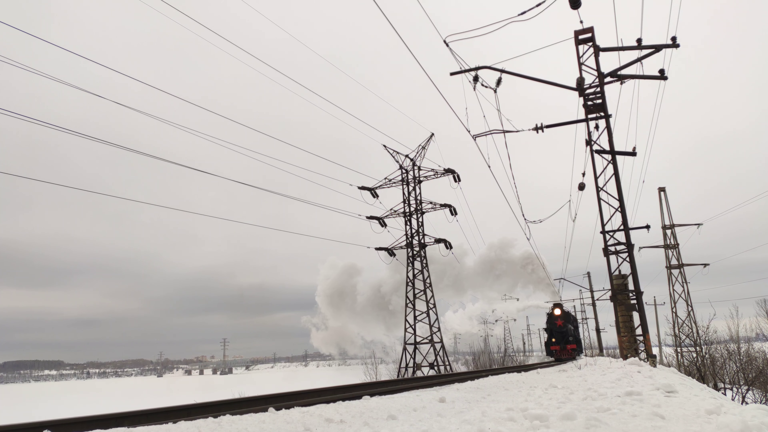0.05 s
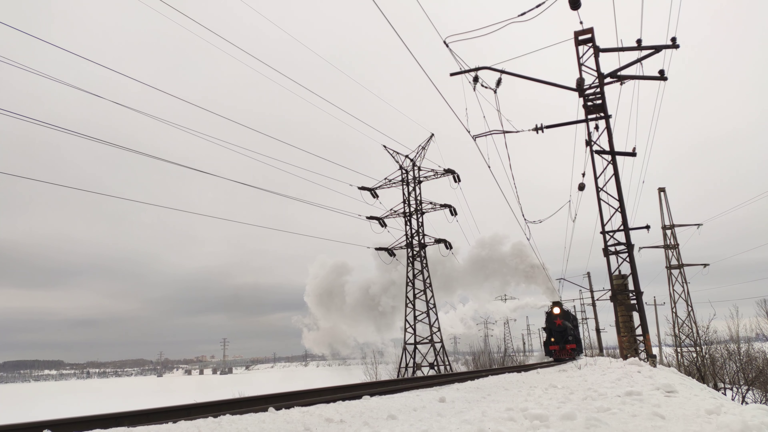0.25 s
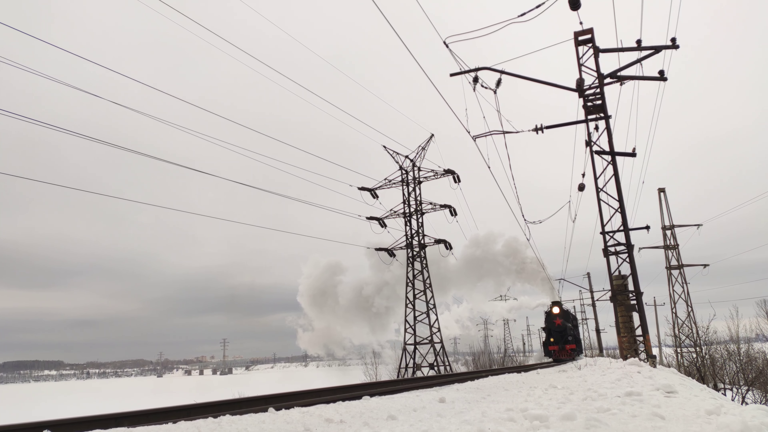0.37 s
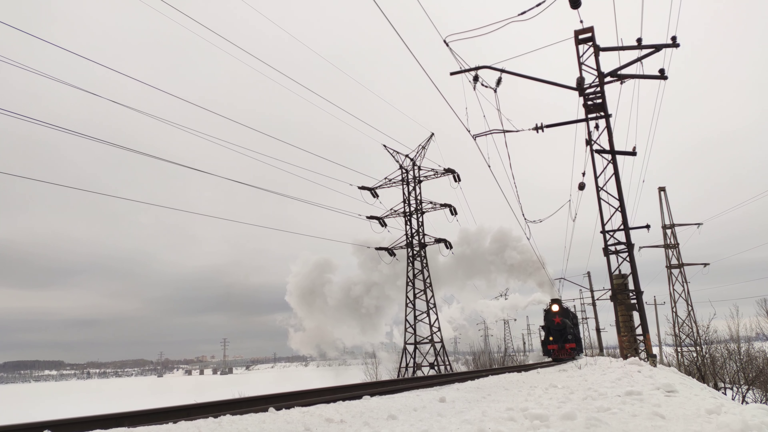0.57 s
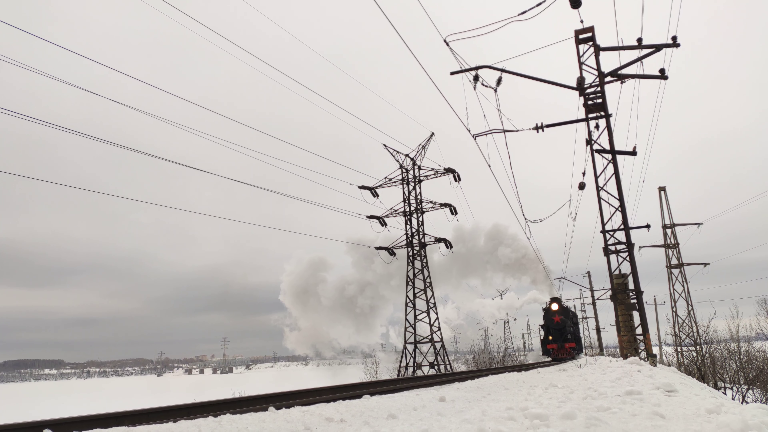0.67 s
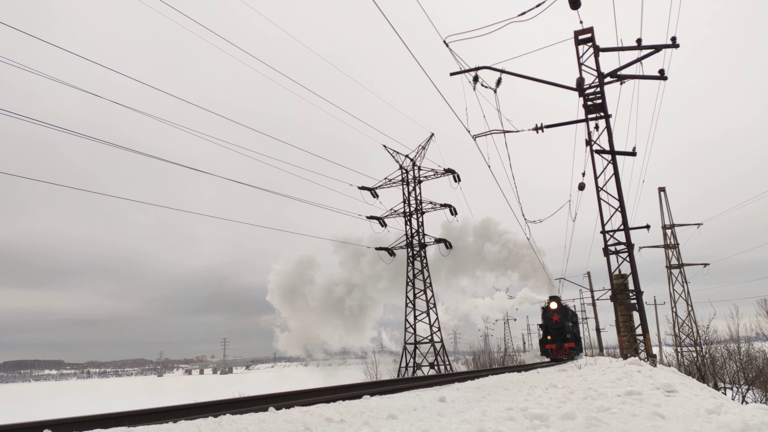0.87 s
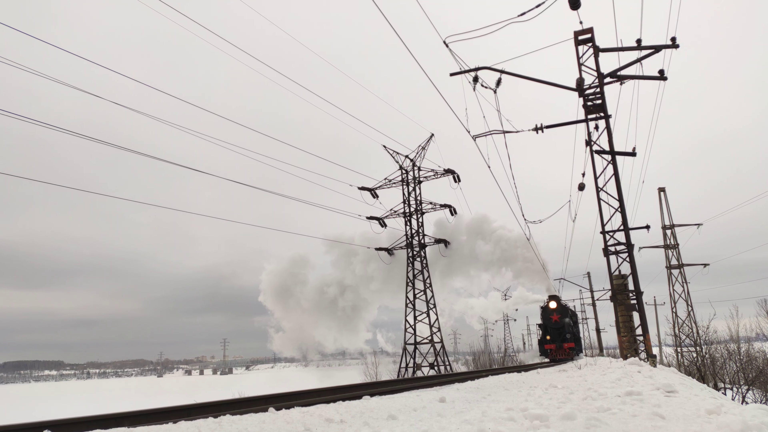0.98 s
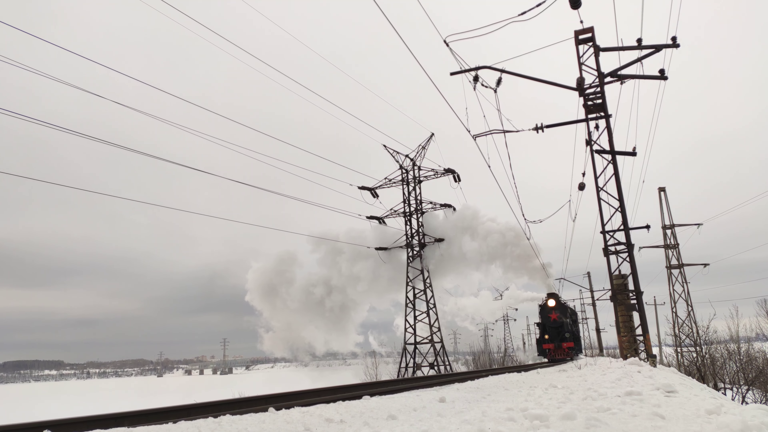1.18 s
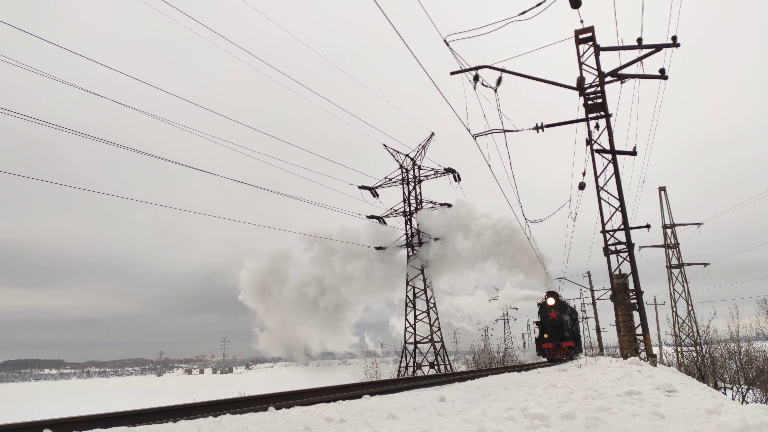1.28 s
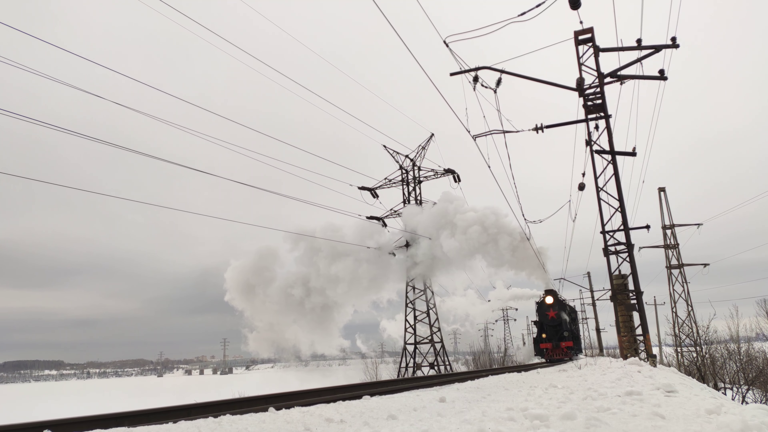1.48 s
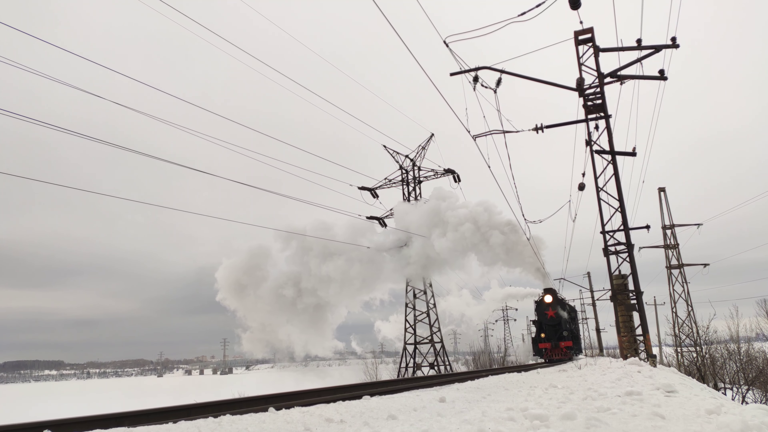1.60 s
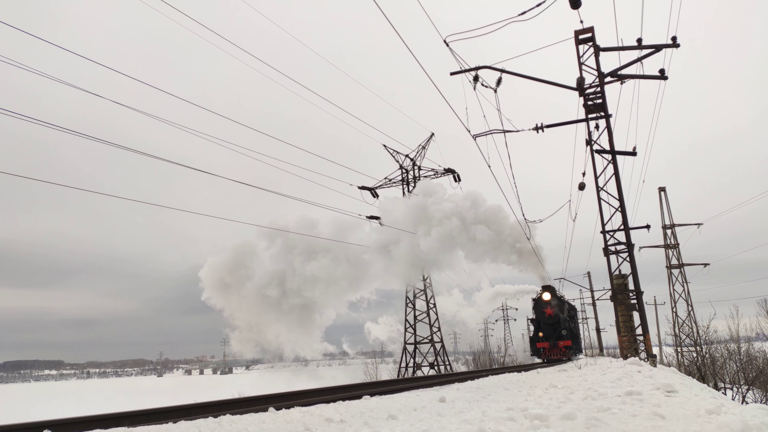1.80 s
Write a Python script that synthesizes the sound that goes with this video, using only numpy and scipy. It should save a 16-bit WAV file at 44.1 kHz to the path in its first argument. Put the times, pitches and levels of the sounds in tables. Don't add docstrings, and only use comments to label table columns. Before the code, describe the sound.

A steam locomotive whistle sounds one reedy mid-pitched blast over hissing steam, low wheel rumble and wind knocks on the microphone; it sags off, then a dull chuff, brief squeak and soft puff follow, echoes fading.

```python
import sys
import numpy as np
from scipy import signal
from scipy.fft import rfft, irfft
from scipy.io import wavfile

SR = 44100
rng = np.random.default_rng(int(sys.argv[2]) if len(sys.argv) > 2 else 0)


def magnitude_from_level(level_db):
    exponent = np.asarray(level_db, float) / 20
    return 10 ** exponent


def int16_out(signal):
    q = np.round(np.clip(np.atleast_2d(signal).T, -1, 1) * 32767)
    wavfile.write(sys.argv[1], SR, q.astype(np.int16))


N = 81585

# start_s [s], level_db [dB]
BLOW = [
    (0.196, -67),
    (0.215, -41),
    (.275, -29.5),
    (0.34, -31.5),
    (0.928, -26.5),
    (0.999, -27.5),
    (1.192, -24.5),
    (1.279, -31.5),
    (1.342, -36),
]


def rms_one(x):
    return x / np.sqrt(np.mean(x ** 2) + 1e-20)


def clock():
    return np.arange(N) / SR


def noise(*shape):
    return rng.standard_normal((*shape, N))


def filtered(x, order, hz, kind="low"):
    return signal.sosfilt(signal.butter(order, hz, kind, fs=SR, output="sos"), x)


def drift(rate_hz):
    pole = np.exp(-80 * np.pi * rate_hz / SR)
    raw = rng.standard_normal(N // 40 + 2002)
    slow = signal.lfilter([1], [1, -2 * pole, pole * pole], raw)[2000:]
    return np.interp(np.arange(N) / 40, np.arange(len(slow)), rms_one(slow))


def complex_drift(rate_hz):
    return drift(rate_hz) + 1j * drift(rate_hz)


def banded_noise(spectrum, patchy_db, channels):
    out, together = 0, drift(7.0)
    edges = 22 * 2 ** np.arange(0, 9.6, .5)
    white = noise(2, channels)
    hz, db = np.transpose(spectrum)
    for k, (low, high) in enumerate(zip(edges, edges[1:])):
        band = filtered(white[k % 2], 2, [low, high], "band")
        level_db = np.interp(np.log(low * high) / 2, np.log(hz), db)
        flicker_db = patchy_db * (.5 * together + drift(12))
        out = out + magnitude_from_level(level_db + flicker_db) * band
    return rms_one(out)


def two_ports(x):
    lag_s, dull_db, dull_hz, dull_sharp = 6.6 / 44100, -4.5, 4700, 2.5
    hz = np.fft.rfftfreq(N, 1 / SR)
    shade = magnitude_from_level(dull_db * np.exp(-dull_sharp * np.log(hz / dull_hz + 1e-9) ** 2))
    delay = np.exp(-2j * np.pi * hz * lag_s)
    return np.array([x, irfft(rfft(x) * shade * delay, N)])


def rumble():
    # frequency_hz [Hz], density_db [dB per Hz]
    roll_spectrum = [(25, -3.5), (150, 0), (400, -2), (800, -6), (1500, -6.5), (2500, -6), (6300, -12),
                     (14000, -50.5)]
    level_db, alike = -44, 0.61
    near, left, right = banded_noise(roll_spectrum, patchy_db=3.0, channels=3)
    diffuse = filtered([left, right], 2, 1800)
    return magnitude_from_level(level_db) * (np.sqrt(alike) * two_ports(near) + np.sqrt(1 - alike) * diffuse)


def wind():
    # start_s [s], peak_db [dB], pitch_hz [Hz]
    knock_table = [(0.024, -26.5, 270), (0.095, -32, 209), (0.112, -27, 254), (0.157, -23.5, 186),
                   (0.17, -39, 153), (0.33, -28, 192), (0.341, -29, 142), (0.354, -20.5, 300),
                   (0.376, -24, 224), (0.394, -25, 190), (0.422, -28.5, 169), (0.437, -33.5, 167),
                   (0.453, -29.5, 242), (0.471, -30.5, 171), (0.499, -30.5, 121), (0.535, -25.5, 168),
                   (0.571, -34, 200.6), (0.623, -31.5, 136), (0.699, -33, 129), (0.787, -35.5, 177),
                   (0.805, -32.5, 102), (0.82, -27.5, 197), (0.833, -30, 245), (0.811, -29.5, 61.6),
                   (.866, -36.5, 53), (1.329, -31, 227), (1.352, -31, 222), (1.44, -36.5, 146),
                   (1.511, -35, 280), (1.535, -43, 157.5), (1.078, -35, 162), (1.148, -32, 214),
                   (1.181, -38, 156), (1.768, -35.5, 116), (1.849, -25.5, 219)]
    # start_s [s], level_db [dB]
    breeze = [(0, 9), (.1, 8.5), (.22, 4), (.4, 6), (.7, -5), (.83, 11), (.95, -14.5), (1.1, 2), (1.3, 0),
              (1.65, -9), (1.78, 9.5), (1.85, 3)]
    lump_db, knock_cycles, push, push_s, leak_db = 5, .62, .3, .009, -35
    t = clock()
    lumps = []
    for level_db, top_hz in [(-51.5, 98), (-70.5, 110)]:
        buffet = rms_one(filtered(noise(), 2, [20, top_hz], "band"))
        lumps.append(magnitude_from_level(level_db + lump_db * drift(8)) * buffet)
    knocks = np.zeros(N)
    for start_s, peak_db, hz in knock_table:
        since = t - start_s
        thump = np.exp(-(since * hz / knock_cycles) ** 2) * np.cos(2 * np.pi * hz * since)
        sway = -push * since / push_s * np.exp(-(since / push_s) ** 2)
        knocks += magnitude_from_level(peak_db) * (thump + sway)
    gusts = magnitude_from_level(np.interp(t, *np.transpose(breeze)))
    return np.array(lumps) * gusts + knocks * magnitude_from_level([[0], [leak_db]])


def puff():
    start_s, attack_s, hold_s, release_s, level_db = 1.398, .025, .1, .09, -43
    corners = np.cumsum([start_s, attack_s, hold_s, release_s])
    shape = np.interp(clock(), corners, [0, 1, .75, 0])
    breath = rms_one(filtered(noise(3), 4, [3400, 7900], "band"))
    return magnitude_from_level(level_db + 1.6 * drift(28)) * shape * breath


def steam():
    # start_s [s], level_db [dB]
    flow = [(0, -62), (0.199, -63), (.33, -52.5), (0.489, -43.5), (0.641, -46), (.8, -51), (0.89, -48),
            (1.02, -44.5), (1.201, -49.5), (1.31, -51.5), (1.62, -54.5), (1.75, -56), (1.85, -46.5)]
    # frequency_hz [Hz], density_db [dB per Hz]
    hiss_spectrum = [(1500, -6.5), (3000, -52.5), (4500, 7.5), (6200, -4), (7200, -0.5), (9000, 4.5),
                     (11000, -13.5), (14000, -6)]
    level_db, spread_db = 3.0, -5
    flow_db = np.interp(clock(), *np.transpose(flow))
    jet = magnitude_from_level(flow_db + level_db) * banded_noise(hiss_spectrum, patchy_db=.8, channels=3) + puff()
    spread = filtered(jet[1:], 2, 4500, "high")
    return two_ports(jet[0]) + magnitude_from_level(spread_db) * spread


def chuff():
    start_s, level_db, rise_s, t60_s = 1.325, -41, 0.017, 0.3
    since = np.maximum(clock() - start_s, 0)
    burst = rms_one(filtered(noise(), 1, (200, 2200), "band"))
    return magnitude_from_level(level_db - 60 * since / t60_s) * np.minimum(since / rise_s, 1) * burst


def squeak():
    start_s, level_db, rise_s, t60_s = 1.343, -41, 0.0049, .17
    pitch_hz, sag_hz_per_s, rough = 1160, 260, .9
    since = np.maximum(clock() - start_s, 0)
    turn = 2 * np.pi * (pitch_hz * since - sag_hz_per_s * since ** 2 / 2)
    roughness = 1 + rough * (drift(109) + 1j * drift(110))
    tone = np.imag(np.exp(1j * turn) * roughness)
    return magnitude_from_level(level_db - 60 * since / t60_s) * tone * np.minimum(since / rise_s, 1)


def late(x, delay_s, ratio):
    t, start_s = clock(), BLOW[0][0]
    return np.interp((t - start_s - delay_s) * ratio + start_s, t, x, left=0)


def near_scatter(x):
    level_db, longest_s, drop, cross_db = -24, .13, .04, -12
    sides = np.zeros((2, N))
    for k, (a, b) in enumerate(rng.random((8, 2))):
        gain = magnitude_from_level(level_db + 9.4 * drift(1.71))
        sides[k % 2] += gain * late(x, longest_s * a, 1 - drop * a * b)
    left, right = filtered(sides, 1, 2000, "high")
    return two_ports(left) * magnitude_from_level([[3], [cross_db]]) + two_ports(right) * magnitude_from_level([[cross_db], [3]])


def echoes(x):
    # delay_s [s], level_db [dB], left_right_db [dB]
    clear = [
        (.09, -20, 0.5),
        (.2, -24.5, 3),
        (.47, -35.5, 11),
        (.66, -30, 3.5),
        (1.0, -33.5, 17),
    ]
    ratios = (.997, .998, .997, .996, .95)
    scatter_db, scatter_t60_s, scatter_drop, flicker_db = -24.5, 1.4, 0.052, 2.0
    returns = [(delay_s, db, ratio, pan_db) for (delay_s, db, pan_db), ratio in zip(clear, ratios)]
    for a, b, c in rng.random((24, 3)):
        returns.append((.1 + a, scatter_db - 60 * a / scatter_t60_s, 1 - scatter_drop * b, 12 * c - 6))
    dull = filtered(x, 2, 2440)
    out = np.zeros((2, N))
    for delay_s, db, ratio, pan_db in returns:
        sides_db = pan_db * np.array([[.5], [-.5]])
        out += magnitude_from_level(db + flicker_db * drift(4.2) + sides_db) * late(dull, delay_s, ratio)
    return out + near_scatter(x)


def air_ray(order):
    share = .05 + .1 * (order - 1)
    flutter = .07 * np.sqrt(order - 1) * complex_drift(55)
    return (1 + flutter + share * complex_drift(21)) / np.sqrt(1 + 2 * share ** 2)


def speaking(order):
    t, gain = clock(), 1
    if order > 1:
        onset_s = .2 + 0.0093 * order + 0.054 * (order == 2)
        gain = np.clip((t - onset_s) / 0.035, 0, 1)
    if order == 2:
        gain = gain * np.clip(1 - (t - 1.215) / 0.019, .2, 1)
    if order > 3:
        gain = gain * np.clip(1 - (t - 1.225) / .04, .35, 1)
    if order == 4:
        gain = gain * magnitude_from_level(-1.5 * (t - 1.07))
    return gain


def whistle():
    blow_hz = (730, 768, 802, 821, 823, 814, 812, 777, 752)
    # multiple [1], level_db [dB]
    partials = [(1, 1.5), (2, -17), (3, -9), (4, -11), (5, -10.5), (6, -13.5), (7, -21), (8, -30),
                (9, -56.5)]
    # start_s [s], depth_db [dB], half_width_s [s]
    fades = [(0.438, 4, 0.032), (0.65, 4, 0.049), (0.738, 7.5, 0.026), (0.868, 7, 0.018),
             (0.956, 8.5, 0.024), (1.041, 10, 0.02), (1.115, 1.5, 0.02), (1.221, 3.5, 0.028)]
    # start_s [s], third_db [dB], upper_db [dB]
    pressure = [(.25, 2, -2.5), (0.361, 4.5, 1), (.46, 5.5, 4), (0.56, 10, 0.5), (.74, 3.5, -2.5),
                (0.94, 1.5, -7.5), (1.05, 5.5, 2), (1.14, -5.5, -5), (1.22, 3, -0.5)]
    # start_s [s], third_db [dB], upper_db [dB], half_width_s [s]
    eddies = [(0.347, 4.5, 8.5, 0.0063), (0.501, 16.5, 3.5, 0.0096), (0.681, 8.5, 15.5, 0.022),
              (0.772, 19, 4, .012), (0.844, 10.5, 5, 0.0086), (0.909, 15, 7.5, 0.0053),
              (1.003, 10, 10, 0.024), (1.11, 14.5, 6.5, 0.022), (1.182, 13, -2.5, 0.011)]
    cut_s, wobble_hz, full_hz, thin_db_per_hz = 0.011, 1.5, 800, .04
    t = clock()
    start_s, level_db = np.transpose(BLOW)
    pitch = np.interp(t, start_s, blow_hz)
    turn = 2 * np.pi * np.cumsum(pitch + wobble_hz * drift(22)) / SR
    gate = np.clip((start_s[-1] + cut_s - t) / cut_s, 0, 1) * (t > start_s[0])
    first_db = -sum(depth_db * np.exp(-((t - at) / width) ** 2) for at, depth_db, width in fades)
    at, third, upper = np.transpose(pressure)
    third_db, upper_db = np.interp(t, at, third), np.interp(t, at, upper)
    for at, third, upper, width in eddies:
        dip = np.exp(-((t - at) / width) ** 2)
        third_db = third_db - third * dip
        upper_db = upper_db - upper * dip
    out = 0
    for order, partial_db in partials:
        jet_db = thin_db_per_hz * (order - 1) * np.minimum(pitch - full_hz, 0)
        if order == 1:
            jet_db = jet_db + first_db
        elif order == 3:
            jet_db = jet_db + third_db
        elif order > 3:
            jet_db = jet_db + upper_db
        ray = air_ray(order) * speaking(order)
        out = out + magnitude_from_level(partial_db + jet_db) * np.imag(ray * np.exp(1j * order * turn))
    return np.sqrt(2) * out * gate * magnitude_from_level(np.interp(t, start_s, level_db))


def scene():
    chime = whistle()
    engine = two_ports(chime + squeak() + chuff())
    return rumble() + wind() + steam() + echoes(chime) + engine


def top_cut(x):
    return signal.sosfilt(signal.butter(12, 15460, fs=SR, output="sos"), x)


def record(dry):
    # frequency_hz [Hz], gain_db [dB]
    response = [(6500, -1), (7300, -9), (8500, -15), (10000, -11), (11200, -28), (12500, -15.5),
                (14300, -19), (15000, -19)]
    hz, db = np.transpose(response)
    colour = magnitude_from_level(np.interp(np.log(np.fft.rfftfreq(N, 1 / SR) + 1), np.log(hz), db))
    hiss = magnitude_from_level(-49) * filtered(noise(2), 2, 7660, "high")
    mix = irfft(rfft(dry + hiss) * colour, N)
    return top_cut(mix)


dry = scene()
out = record(dry)
int16_out(out)
```